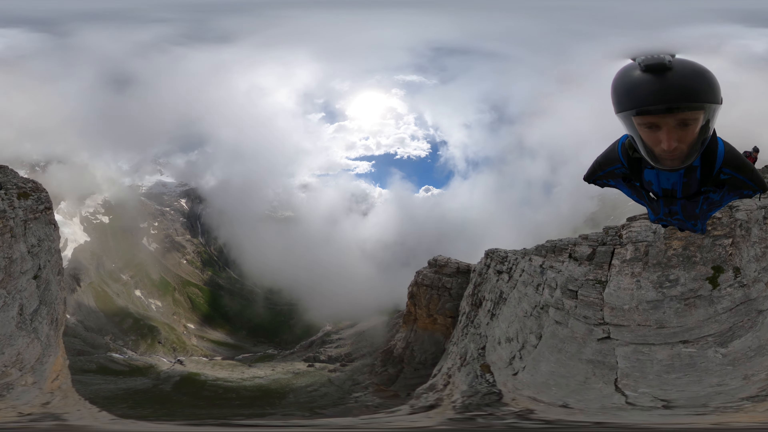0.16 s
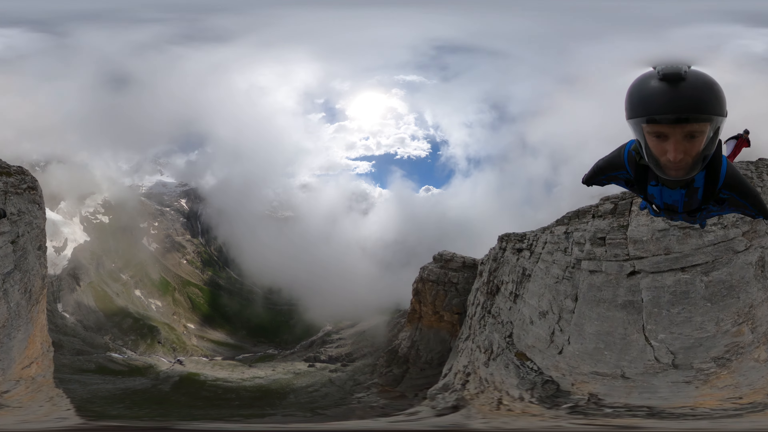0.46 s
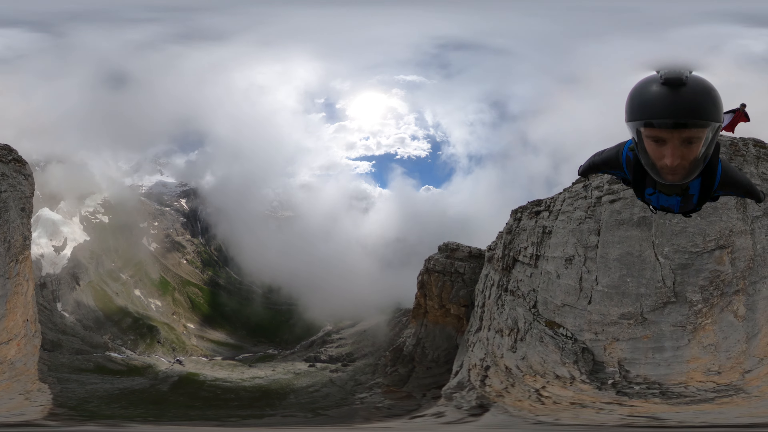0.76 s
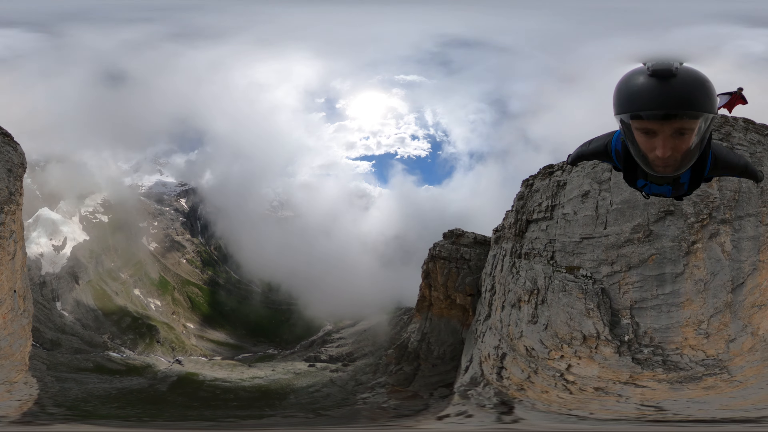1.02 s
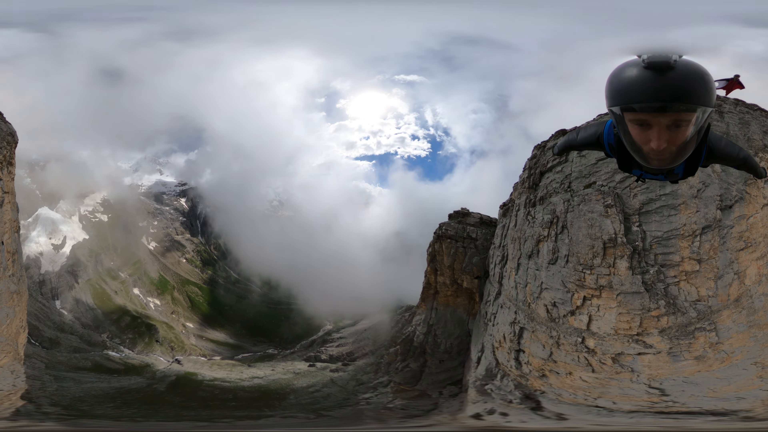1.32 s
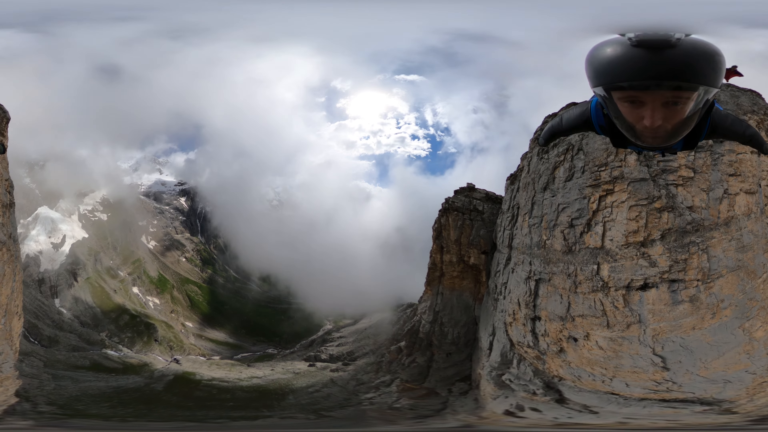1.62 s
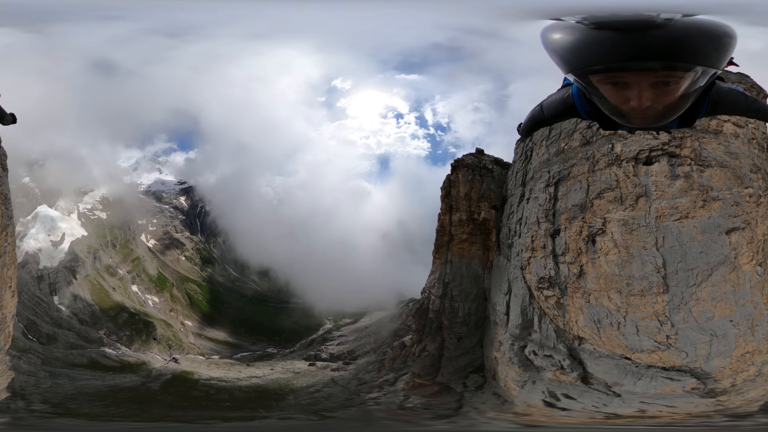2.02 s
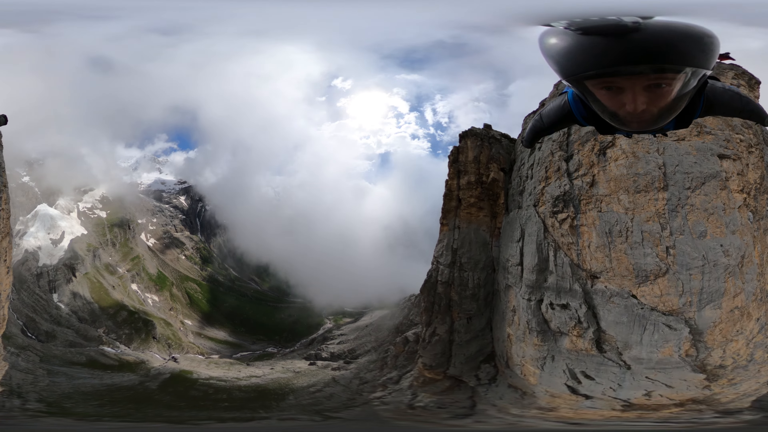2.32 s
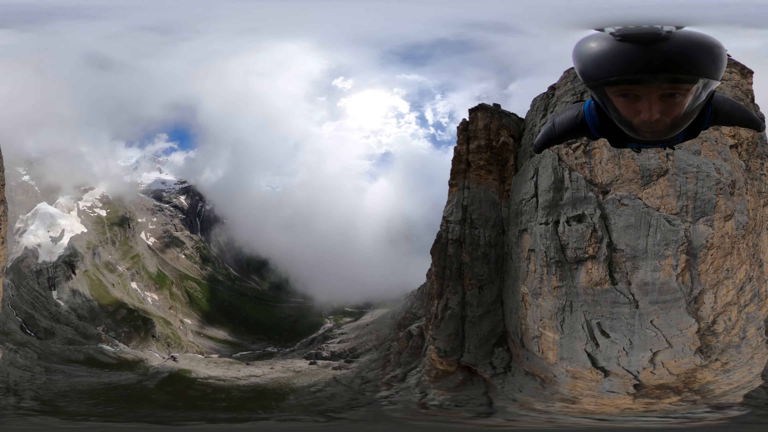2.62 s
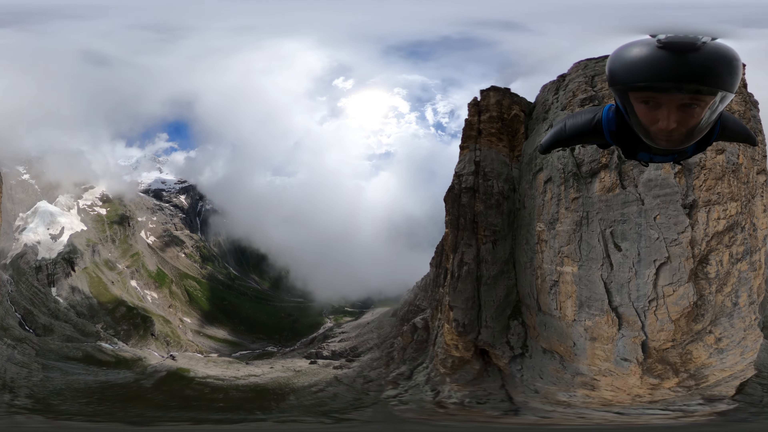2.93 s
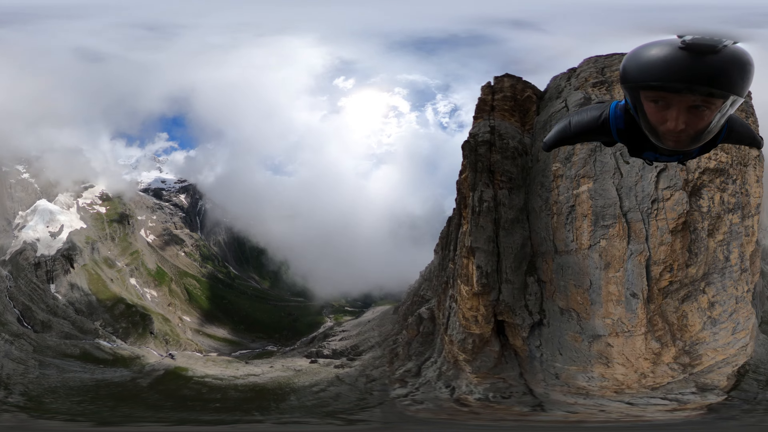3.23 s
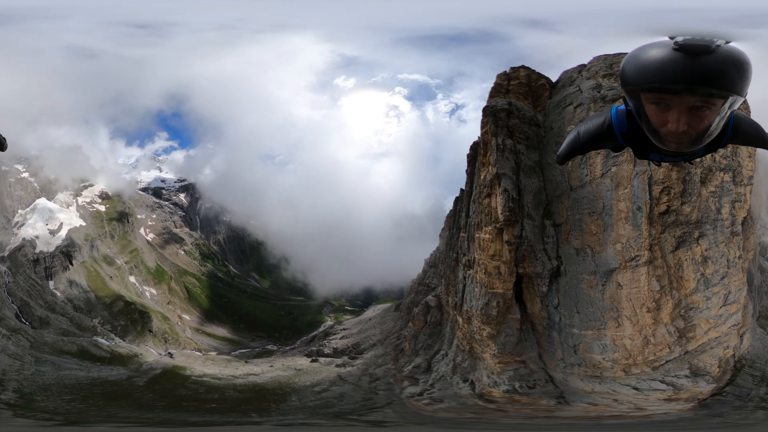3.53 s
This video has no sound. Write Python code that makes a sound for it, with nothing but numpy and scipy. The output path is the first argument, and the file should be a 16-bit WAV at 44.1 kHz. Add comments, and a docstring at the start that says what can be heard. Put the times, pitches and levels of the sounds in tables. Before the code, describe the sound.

Wind rushing past a falling jumper's helmet microphone swells from low rumble to loud, bright, buffeting roar

```python
"""At a cliff edge and down through open air, a small microphone rides on the helmet of a jumper in a fabric suit.
Right at the microphone port, eddies (noise in lumpy bands) rumble low and brighten as the flutter strengthens;
single eddies slap it with short pressure pulses. Rushing air, three bands of noise, grows louder and brighter
overall as speed builds. Close by, the suit rustles at the push-off (dense random creases under short swells)
and gear ticks there and again late in the fall (struck ringing modes)."""
import sys
import numpy as np
from scipy import signal
from scipy.fft import rfft, irfft, next_fast_len
from scipy.io import wavfile
from scipy.ndimage import uniform_filter1d

SR = 44100
rng = np.random.default_rng(int(sys.argv[2]) if len(sys.argv) > 2 else 0)


def dump(signal):
    """Clip the signal to [-1, 1] and save it as 16-bit WAV at the path in sys.argv[1]."""
    limited = np.clip(np.atleast_2d(signal).T, -1, 1)
    pcm = np.round(limited * 32767).astype(np.int16)
    wavfile.write(sys.argv[1], SR, pcm)


N = 161406

# Slow heave of pressure at the port: [t/s, level/dB]
HEAVE_LEVELS = [(0.0, -35), (.25, -31), (.35, -36), (0.9, -26), (1.25, -35), (1.45, -26), (1.7, -29),
                (1.9, -25), (2.05, -25.5), (2.25, -17.5), (2.35, -34), (2.45, -29), (2.55, -27),
                (2.65, -21), (2.76, -34), (2.96, -31), (3.05, -27.5), (3.41, -20.5), (3.56, -27.5),
                (3.64, -32)]
# Colour of the heave: [f/Hz, relative level per Hz/dB]
HEAVE_COLOUR = [(5, -17.5), (10, 7.5), (20, 3), (35, 2.5), (50, -20.5), (80, -50)]
# Larger eddies, before lumps and skew: [t/s, thud level/dB, rumble level/dB]
BUFFET_LEVELS = [(0.05, -41, -47.5), (0.12, -35.5, -42), (0.17, -48, -45), (0.25, -39.5, -52.5),
                 (0.35, -31, -35), (0.45, -25.5, -35), (0.48, -22, -35), (0.6, -25.5, -38.5),
                 (0.74, -20.5, -23.5), (0.77, -22, -31.5), (1.0, -21.5, -28), (1.06, -24, -22.5),
                 (1.21, -19.5, -29.5), (1.31, -27.5, -34), (1.34, -19.5, -27), (1.44, -22.5, -28),
                 (1.5, -17.5, -21), (1.6, -21.5, -18.5), (1.7, -23.5, -22.5), (1.75, -15.5, -25),
                 (1.8, -23, -16), (1.85, -16.5, -26.5), (1.9, -22.5, -21.5), (1.94, -20, -25),
                 (2.0, -15, -21), (2.13, -23, -23), (2.22, -28, -22.5), (2.3, -23, -16.5), (2.39, -15, -20),
                 (2.42, -22, -22.5), (2.44, -20, -18.5), (2.49, -18.5, -25.5), (2.52, -17, -17.5),
                 (2.69, -22, -26), (2.72, -13.5, -19.5), (2.77, -39, -35), (2.84, -15.5, -25),
                 (3.0, -34.5, -29), (3.03, -28, -26), (3.09, -28, -27), (3.25, -17.5, -21.5),
                 (3.3, -17.5, -20), (3.36, -20, -26), (3.42, -24, -24.5), (3.57, -29, -27),
                 (3.61, -24, -24), (3.65, -18, -21.5)]
# Smallest eddies, in bursts, before lumps and skew: [t/s, level/dB]
FLUTTER_LEVELS = [(.25, -51), (.7, -48), (.735, -35), (.77, -44), (.93, -47.5), (1.0, -32.5), (1.05, -43.5),
                  (1.09, -35), (1.16, -43.5), (1.2, -34), (1.27, -38.5), (1.45, -37.5), (1.53, -34),
                  (1.62, -30.5), (1.67, -31.5), (1.73, -31), (1.82, -34), (1.91, -31), (2.0, -27),
                  (2.1, -31.5), (2.16, -33), (2.22, -26), (2.285, -25.5), (2.305, -19.5), (2.325, -18),
                  (2.34, -18.5), (2.365, -22.5), (2.39, -19), (2.42, -28.5), (2.455, -19), (2.49, -32),
                  (2.52, -23), (2.57, -22.5), (2.6, -29.5), (2.635, -23.5), (2.68, -38.5), (2.72, -22.5),
                  (2.74, -31.5), (2.78, -38), (2.85, -33), (3.0, -37), (3.17, -34), (3.195, -21.5),
                  (3.27, -22.5), (3.3, -31.5), (3.355, -19.5), (3.4, -33), (3.6, -37.5), (3.65, -26.5)]
# Colours of thud, rumble and flutter, a list for each: [f/Hz, relative level per Hz/dB]
EDDY_COLOURS = [
    [(20, -29), (36, 0), (65, 7.5), (105, 1.5), (150, -33), (250, -56.5)],
    [(50, -42), (90, -10.5), (125, 6.5), (190, 4), (280, -8.5), (400, -30), (600, -60)],
    [(140, -34.5), (230, -4), (300, 1), (420, -1), (560, -4.5), (750, -10.5), (1000, -10), (1500, -19),
     (2500, -44)],
]
# Rushing air, before the layer gains: [t/s, roar level/dB, hiss level/dB, treble level/dB]
RUSH_LEVELS = [(0, -51, -62, -75), (.16, -52.5, -61, -71), (.38, -53.5, -63.5, -71.5),
               (.47, -50, -65, -71.5), (.53, -51.5, -61.5, -74), (.6, -49, -59.5, -73),
               (.68, -49, -62.5, -73), (.8, -51.5, -64.5, -74), (1.0, -50.5, -62, -73.5),
               (1.2, -49.5, -61.5, -70), (1.5, -48, -57, -66), (1.66, -48, -57, -64),
               (1.74, -46.5, -52.5, -60.5), (1.85, -48.5, -54, -58), (2.0, -45, -49.5, -55),
               (2.3, -46.5, -50.5, -54.5), (2.6, -44.5, -48, -50), (2.8, -44, -47.5, -47.5),
               (3.0, -40.5, -46, -45.5), (3.13, -37, -45.5, -45), (3.3, -37, -42.5, -42.5),
               (3.45, -39.5, -45.5, -44), (3.66, -39.5, -43.5, -43.5)]
# Colours of roar, hiss and treble, a list for each: [f/Hz, relative level per Hz/dB]
AIR_COLOURS = [
    [(150, -9.5), (400, -0.5), (800, -3.5), (1100, -6), (1500, -7.5), (2200, -12), (3200, -20), (5000, -55)],
    [(1200, -26), (2000, -5.5), (2800, 1), (4200, -1.5), (5500, -11.5), (7000, -43), (9000, -56)],
    [(3000, -34), (4600, -4), (5800, -2.5), (7000, -6.5), (8000, -12), (9200, -24.5), (11000, -28),
     (15000, -48.5)],
]
# Swells of suit rustle: [peak t/s, level/dB, rise t/s, fall t/s, dulled above f/Hz]
RUSTLE_SWELLS = [(0.083, -35.5, 0.028, 0.047, 14000), (0.0405, -37, .001, 0.0066, 3200),
                 (0.071, -34, 0.0037, .003, 4000), (0.0565, -45, 0.0021, 0.007, 8200),
                 (0.086, -31, 0.0038, .003, 4000), (.098, -30, 0.00083, 0.0036, 6300),
                 (.295, -46, 0.023, 0.018, 12000)]
# Colour of creasing fabric: [f/Hz, relative level per Hz/dB]
FABRIC_COLOUR = [(100, 5), (350, -1.5), (1000, -13), (1500, -15.5), (2200, -25), (4000, -27.5), (8000, -40),
                 (11000, -48.5), (14000, -46)]
# Hard ticks of gear, strength before each mode's share: [t/s, level/dB]
GEAR_TICKS = [(.055, -32), (.118, -42), (.2103, -31), (.2125, -44), (3.329, -21), (3.537, -29)]
# Ringing modes of the gear: [f/Hz, relative level/dB, 60 dB decay t/s]
GEAR_MODES = [(710, 1.5, 0.017), (1300, -7, 0.0066), (1870, -10, 0.0064), (2350, -3.5, 0.0087),
              (3120, -13, .006)]
# Strong eddies at the port, push before its pull is taken off: [t/s, level/dB, width t/s]
PORT_SLAPS = [(1.636, -23, .0006), (1.671, -20, 0.00045), (1.704, -21, 0.0005), (2.298, -15, 0.00041),
              (3.2, -7, 0.00091), (3.344, -3, 0.00093), (3.359, -6, .0008)]

# Lump depth of thud, rumble and flutter; rates of the shared and own lumps; sharpening of pushes
EDDY_LUMP_DB, SHARED_LUMP_HZ, OWN_LUMP_HZ, EDDY_SKEW = [-0.2, 0.93, 1.27], 24, 55, .06
# Stronger flutter reaches higher; beyond its reach each band falls off steeply
REACH_HZ, REACH_AT_DB, DB_PER_OCTAVE, LEAST_REACH_HZ, REACH_STEEPNESS = 615, -31, 15.5, 380, 4.5
# Gains of roar, hiss and treble; flicker of each band
AIR_GAIN_DB, RUSH_FLICKER_DB = [6, 2.5, 0.56], 0.64
CREASES_PER_S, CREASE_SPREAD_DB = 5000, 1.5
CONTACT_HZ, TICK_SPREAD_DB = 3200, 1.5   # soft contact dulls the ticks
# Treble gain control: threshold, dB of cut per dB above it, smoothing time
DUCK_ABOVE_DB, DUCK_SHARE, DUCK_S = -15, .9, .025
PUSH_LIMIT, PULL_LIMIT = 0.68, 0.44   # overload, as a share of full scale
TREBLE_FROM_HZ, STOP_HZ = 1500, 15500
EVENING_SAMPLES = 3500   # about 80 ms


def from_db(db):
    """dB to gain."""
    return 10 ** (np.asarray(db) / 20)


def rms_one(x):
    """Scale to unit rms."""
    return x / np.sqrt(np.mean(x ** 2) + 1e-20)


def in_time(rows):
    """Columns of a curve table at every sample."""
    s, *columns = np.transpose(rows)
    return [np.interp(np.arange(N) / SR, s, column) for column in columns]


def drift(rate_hz):
    """Slow chance of spread 1: noise at every 40th sample through a double one-pole low-pass."""
    pole = np.exp(-80 * np.pi * rate_hz / SR)
    noise = rng.standard_normal(N // 40 + 2002)
    slow = signal.lfilter([1], [1, -2 * pole, pole * pole], noise)[2000:]   # settled part
    return np.interp(np.arange(N) / 40, np.arange(len(slow)), rms_one(slow))


def bands(x, colour):
    """Colour x (rms 1) and split it into overlapping bands half an octave apart: [(Hz, band)]."""
    size = next_fast_len(N)
    octave = np.log2(np.arange(size // 2 + 1) * SR / size + 1)
    hz, db = np.transpose(colour)
    shaped = rfft(x, size) * from_db(np.interp(octave, np.log2(hz), db, left=-150))
    shaped = shaped / np.std(irfft(shaped, size))
    out = []
    for centre in np.arange(np.log2(hz[0]), np.log2(hz[-1]) + .5, .5):
        triangle = np.clip(1 - 2 * abs(octave - centre), 0, 1)
        out.append((2 ** centre, irfft(shaped * triangle, size)[:N]))
    return out


def local_power(x):
    """Mean square over a short moving window."""
    return uniform_filter1d(x ** 2, size=EVENING_SAMPLES) + 1e-9


def evened(x):
    """Take out chance swells longer than the window."""
    return x / np.sqrt(local_power(x))


def buffeting():
    """Heave and three sizes of eddies share one turbulence; pushes are sharper than pulls."""
    shared_lumps = drift(SHARED_LUMP_HZ)
    turbulence = rng.standard_normal(N)
    levels = in_time(BUFFET_LEVELS) + in_time(FLUTTER_LEVELS)
    heave = sum(band for hz, band in bands(turbulence, HEAVE_COLOUR))
    out = from_db(in_time(HEAVE_LEVELS)[0]) * evened(heave)
    octaves_up = (levels[2] - REACH_AT_DB) / DB_PER_OCTAVE
    reach_hz = np.maximum(REACH_HZ * 2 ** octaves_up, LEAST_REACH_HZ)
    for level_db, colour, lump_db in zip(levels, EDDY_COLOURS, EDDY_LUMP_DB):
        layer = sum(band / (1 + (hz / reach_hz) ** REACH_STEEPNESS)
                    for hz, band in bands(turbulence, colour))
        lumps = shared_lumps + 0.92 * drift(OWN_LUMP_HZ)
        out = out + evened(layer) * from_db(level_db + lump_db * lumps)
    power = local_power(out)
    return out + EDDY_SKEW * (out ** 2 - power) / np.sqrt(power)


def rush():
    """Smooth noise of passing air in three layers, each band flickering a little, partly together."""
    out, together = 0, drift(13.0)
    for level_db, colour, gain_db in zip(in_time(RUSH_LEVELS), AIR_COLOURS, AIR_GAIN_DB):
        for hz, band in bands(rng.standard_normal(N), colour):
            flicker_db = RUSH_FLICKER_DB * (together + 0.34 * drift(16))
            out = out + band * from_db(level_db + gain_db + flicker_db)
    return out


def rustle():
    """Fabric buckles in dense creases of uneven size and either sign, under short swells."""
    t = np.arange(N) / SR
    sizes = from_db(CREASE_SPREAD_DB * np.minimum(rng.exponential(1, N), 4)) * rng.choice([-1, 1], N)
    impulses = sizes * (rng.random(N) < CREASES_PER_S / SR)
    creases = sum(band for hz, band in bands(impulses, FABRIC_COLOUR))
    out = 0
    for s, db, rise, fall, dull_hz in RUSTLE_SWELLS:
        swell = np.exp(-.5 * ((t - s) / np.where(t < s, rise, fall)) ** 2)
        dulled = signal.lfilter(*signal.butter(2, dull_hz, fs=SR), creases)
        out = out + from_db(db) * swell * dulled
    return out


def ticks():
    """Each tick strikes every decaying mode of the gear with a strength of its own."""
    s, db = np.transpose(GEAR_TICKS)
    chance_db = rng.normal(0, TICK_SPREAD_DB, (len(s), len(GEAR_MODES)))
    out = 0
    for (hz, mode_db, t60), own_db in zip(GEAR_MODES, chance_db.T):
        clicks = np.full(N, 1e-18)
        clicks[(s * SR).astype(int)] = from_db(db + mode_db + own_db)
        r = from_db(-60 / (t60 * SR))   # decay per sample
        w = 2 * np.pi * hz / SR
        out = out + signal.lfilter([0, np.sin(w)], [1, -2 * r * np.cos(w), r * r], clicks)
    return signal.lfilter(*signal.butter(3, CONTACT_HZ, fs=SR), out)


def slaps():
    """A strong eddy gives a short push of pressure with a shallow pull either side."""
    t = np.arange(N) / SR
    out = 0
    for s, db, width in PORT_SLAPS:
        push = np.exp(-.5 * ((t - s) / width) ** 2)
        pull = 0.21 * np.exp(-.5 * ((t - s) / (2.1 * width)) ** 2)
        out = out + from_db(db) * (push - pull)
    return out


def scene():
    """All sources at the one helmet microphone."""
    return (buffeting() + rush() + rustle() + ticks() + slaps())[None]


def record(dry):
    """Gain control ducks the treble when the sound is loud; low peaks are rounded, the top is cut."""
    keep = np.exp(-1 / (DUCK_S * SR))
    level_db = 10 * np.log10(signal.lfilter([1 - keep], [1, -keep], dry ** 2) + 1e-9)
    low = signal.sosfiltfilt(signal.butter(2, TREBLE_FROM_HZ, fs=SR, output="sos"), dry)
    high = (dry - low) * from_db(-DUCK_SHARE * np.maximum(level_db - DUCK_ABOVE_DB, 0))
    limit = np.where(low > 0, PUSH_LIMIT, PULL_LIMIT)
    rounded = limit * np.tanh(low / limit)
    top_cut = signal.cheby2(12, 70, STOP_HZ, fs=SR, output="sos")   # 70 dB down from STOP_HZ
    return signal.sosfilt(top_cut, rounded + high)


dry = scene()
out = record(dry)
dump(out)
```